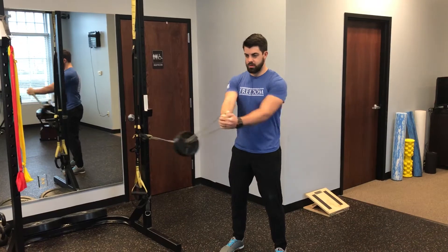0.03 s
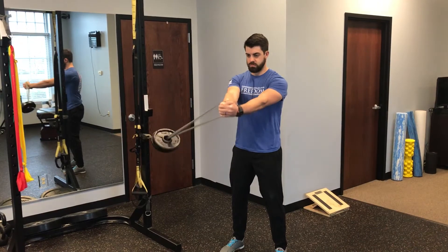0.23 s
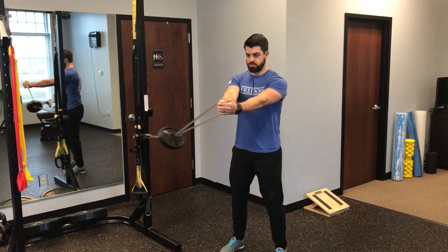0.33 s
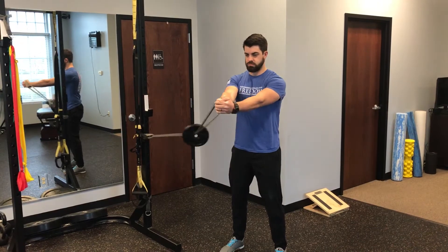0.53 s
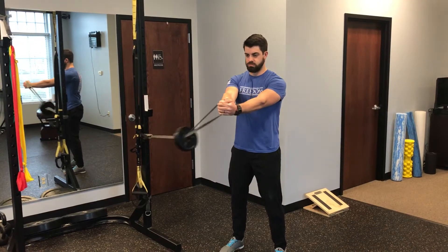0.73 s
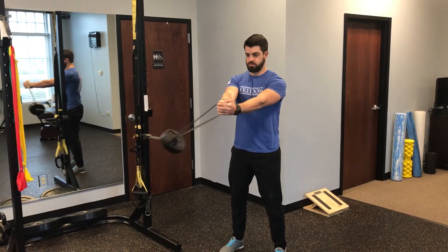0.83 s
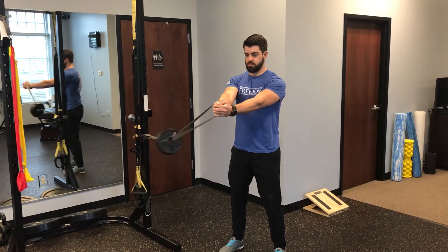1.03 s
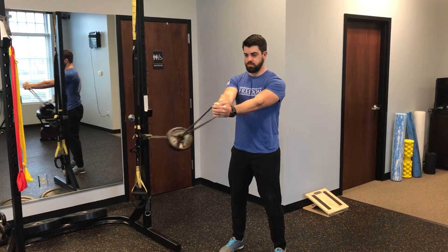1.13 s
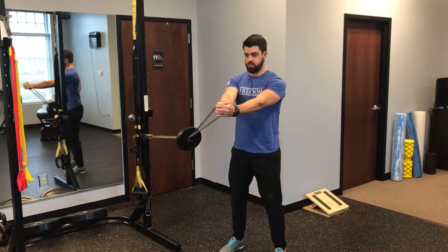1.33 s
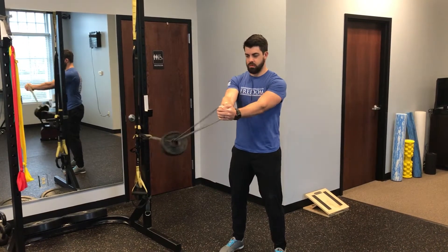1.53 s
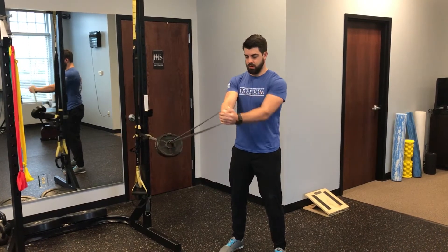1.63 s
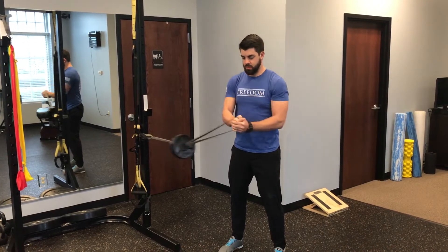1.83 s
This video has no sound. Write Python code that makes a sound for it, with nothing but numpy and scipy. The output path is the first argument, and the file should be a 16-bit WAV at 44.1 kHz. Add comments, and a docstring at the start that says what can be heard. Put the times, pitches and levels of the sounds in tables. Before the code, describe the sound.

Sharp, uneven clanks of a swinging weight plate, with faint squealing scrapes over a low hum.

```python
"""Swinging weight plate

An iron plate swings on a band tied to a steel rack in a small gym. At each turn it knocks and
chatters against its fittings; between knocks it scrapes with a faint squeal. The bare walls
ring on after every clank, over a low ventilation hum and one faint swell of rustle."""
import sys
import numpy as np
from scipy import signal
from scipy.fft import rfft, irfft
from scipy.io import wavfile

SR = 44100
rng = np.random.default_rng(int(sys.argv[2]) if len(sys.argv) > 2 else 0)


def store_pcm(level_fs):
    """Save levels as 16-bit WAV."""
    pcm = np.round(np.clip(level_fs, -1, 1) * 32767).astype(np.int16)
    wavfile.write(sys.argv[1], SR, np.atleast_2d(pcm).T)


N = 83790

# Ventilation hum: pitch_hz, level_db
HUM_TONES = [(58.5, -53), (118, -53), (175, -61.5), (232, -60.5)]
# Colour of the air bed: frequency_hz, relative_db
AIR_COLOUR = [(20, -32), (40, -14.5), (55, 5), (85, -7), (130, 1), (200, -7.5), (290, -9), (420, -21),
              (800, -20), (1200, -21.5), (2400, -29), (4300, -30.5), (7500, -34.5), (12500, -39.5),
              (16000, -40.5)]

# First row: the faint fading ring of a clank at the very start; the rest: scrape strokes.
# start_s, length_s, grind_db, tilt_db_per_octave, squeal_db, upper_squeal_db
TAIL_AND_SCRAPE_CUES = [(0, 0.032, -64.5, 3.5, -65.5, -69), (.29, 0.13, -42, 2, -34, -62),
                        (0.367, 0.18, -46, -1.5, -50, -48.5), (.937, 0.13, -45.5, 7, -44, -57),
                        (1.029, 0.2, -58.5, 3.5, -58, -70)]
# Colour of the grind: frequency_hz, relative_db
GRIND_COLOUR = [(300, -25.5), (800, -6.5), (1150, 3), (1400, -5), (1800, 2), (2300, 3), (3000, -0.5),
                (3600, -4), (4400, -4), (5200, -19), (9000, -32), (16000, -39.5)]
# Low resonances that sing under friction: pitch_hz, width_hz, relative_db
LOW_SQUEAL_MODES = [(1671, 2.3, 5), (1734, 9, -14), (1767, 6.9, -10.5), (1850, 8.9, -8), (1954, 6.8, -12),
                    (2220, 7.5, -14)]
# High resonances that sing under friction: pitch_hz, width_hz, relative_db
UPPER_SQUEAL_MODES = [(3245, 5.4, 1), (2918, 22, -3), (4110, 100, -5), (4560, 25, -4), (7343, 14.4, -10.5),
                      (11700, 33, -19)]

# Hits on the plate: start_s, crack_db, tilt_db_per_octave, plate_db, steel_db, rack_db
HIT_CUES = [ (0.202, -6, 0.5, 2, -29, -54), (.2490, -37, -8, -16, -42, -41),
            (0.2776, -9.5, -4.5, -10, -31, -17.5), (0.3816, -13.5, -4.5, -23, -16, -35),
            (.3970, -24, -6.5, -7, -29, -23.5), (.5206, 5, 0.3, 3, -2.5, -11),
            (.5236, 2, -0.2, -19, -8, -20), (0.5333, 8.5, 3, -10.5, -7, -20),
            (.5360, 4.5, 1, -12, -25, -26), (.5372, 2.5, 4, -24, -24, -38),
            (.5448, -7, -3.5, -32, -13, -36), (.7435, -18.5, 0, -54, -45, -51.5),
            (0.9097, -8, -0.5, -45, -27, -33.5), (0.9126, -5.5, -3.5, -22.5, -36, -22),
            (.9190, -11, 6, -32, -26, -41), (.9241, -8, 5.5, -28, -30, -49),
            (.9507, -16.5, -2, -25, -36, -42), (1.000, -33, -13, -12.5, -43.5, -40),
            (1.053, -47, -4, -12.5, -48.5, -29), (1.087, -40, -5, -14, -46, -46),
            (1.292, -8, 3, -14.5, -27, -6.5), (1.3040, -23, 0, -10.5, -33, -9.5),
            (1.3435, -14.5, -2.5, -29, -32, -23), (1.4120, -21, -2.5, -36, -36, -26),
            (1.4520, -23.5, -2, -21.5, -45, -28), (1.5779, -15, 0, -12, -21, -31),
            (1.5855, -5, 1.5, -28, -51, -35), (1.5909, -14.5, -7, -22, -37, -36),
            (1.5941, -8.5, -1.5, -19.5, -42, -35), (1.6010, -7.5, 4, -33, -35, -26)]
# Colour of the contact click: frequency_hz, relative_db
CLICK_COLOUR = [(100, -51), (400, -12.5), (800, -11), (1400, 1.5), (2200, -2), (3700, 3), (4700, -1),
                (5800, 3), (7600, -2.5), (9200, 1.5), (10300, -7), (11500, -3), (16000, -6)]
# Knock of the iron plate: pitch_hz, relative_db, t60_s
PLATE_MODES = [(1077, -9.5, 0.051), (1111, -5.5, 0.051), (1137, -2, 0.14), (1180, -1.5, 0.054),
               (1524, -6, 0.087), (1600, 0, .04)]
# Ring of the steel fittings: pitch_hz, relative_db, t60_s
STEEL_MODES = [(1254, -3.5, 0.52), (1658, -8.5, 0.66), (2910, -18, .22), (3578, 2.5, 0.29),
               (3650, 9.5, 0.22), (3728, -5, .33), (3720, 6, 0.15), (5420, 7.5, 0.13), (5722, -12, .25),
               (5835, -14, .25), (6239, -3, 0.22), (7064, -6.5, 0.18), (8440, -25.5, .18),
               (8550, -0.5, .15)]
# Clunk of the rack: pitch_hz, relative_db, t60_s
RACK_MODES = [(461, -6, 0.15), (531.6, -11, 0.13), (907, -15.5, .09), (969, 1.5, 0.055), (1375, -12, 0.071),
              (1410, -1.5, 0.041), (1567, 0.5, 0.052), (1865, -9.5, 0.074)]

# Flurries from the loose fittings: start_s, length_s, level_db, tilt_db_per_octave
CHATTER_CUES = [(.203, 0.063, -37, -6), (.273, 0.086, -40.5, -1.6), (0.526, 0.044, -27, 0),
                (.912, 0.045, -41, 6.5), (1.297, 0.073, -42, -2.2), (1.347, 0.16, -49, -2.3),
                (1.58, 0.069, -34, .1)]
# Colour of the chatter: frequency_hz, relative_db
CHATTER_COLOUR = [(100, -31), (400, -17.5), (800, -8), (1400, 3), (2200, -1), (3700, -2.5), (4900, -2),
                  (6500, 4.5), (9200, 0.5), (10300, -5.5), (11500, -6.5), (16000, -11.5)]

# Reverb decay of the gym: frequency_hz, t60_s
ROOM_DECAY = [(150, 0.46), (500, 0.74), (1200, 0.65), (2500, 0.59), (4000, 0.55), (7000, 0.44),
              (10000, 0.37), (15000, 0.19)]
# Early reflections off the walls: delay_s, gain
WALL_ECHOES = [(.0032, 0.15), (.0098, 0.22), (0.0147, .15), (0.0194, 0.14)]
ROOM_DB, SQUEAL_ROOM_DB = -4, -6.5  # reverb tail against the direct sound


def amp(db):
    """Decibels to gain."""
    return 10 ** (np.asarray(db) / 20)


def unit(x):
    """Scales to an rms of one."""
    return x / np.sqrt(np.mean(x ** 2) + 1e-20)


def read(points, hz):
    """Reads a table on a log-frequency axis."""
    f, value = np.transpose(points)
    return np.interp(np.log(hz + 1), np.log(f), value)


def add(mix, s, sound):
    """Mixes a sound in at time s."""
    part = mix[max(round(s * SR), 0):][:len(sound)]
    part += sound[:len(part)]


def bump(centre_s, half_width_s):
    """A bell-shaped envelope that peaks at one."""
    return np.exp(-((np.arange(N) / SR - centre_s) / half_width_s) ** 2)


def drift(width_hz):
    """Slow complex noise that makes a tone waver in level and phase."""
    hz = np.fft.rfftfreq(N, 1 / SR)
    a, b = irfft(rfft(rng.standard_normal((2, N))) / (1 + (hz / width_hz) ** 4), N)
    return (unit(a) + 1j * unit(b)) / np.sqrt(2)


def ventilation():
    """The bed: a wavering hum in soft air noise, whose top end dips briefly."""
    t = np.arange(N) / SR
    air_gain = amp(read(AIR_COLOUR, np.fft.rfftfreq(N, 1 / SR)))
    air = irfft(rfft(rng.standard_normal(N)) * air_gain, N)
    hum = np.zeros(N)
    for hz, db in HUM_TONES:
        waver = 1 + 0.32 * drift(width_hz=18)
        tone = np.exp(2j * np.pi * (hz * t + rng.random()))
        hum += amp(db) * unit((waver * tone).real)
    hiss = signal.sosfiltfilt(signal.butter(4, 5000, "high", fs=SR, output="sos"), air)
    dip_db = -10 * bump(centre_s=1.125, half_width_s=0.06)
    return amp(-49) * unit(air + hiss * (amp(dip_db) - 1)) + hum


def grains(count, per_s, spread_db):
    """A random train of tiny contacts of uneven size."""
    sizes = amp(spread_db * np.minimum(rng.exponential(1, count), 3)) * rng.choice([-1, 1], count)
    return unit(sizes * (rng.random(count) < per_s / SR))


def click(colour, tilt, size=2048, pivot_hz=5000):
    """One contact of unit energy, with the given colour and a tilt in dB per octave."""
    hz = np.fft.rfftfreq(size, 1 / SR)
    db = read(colour, hz) + tilt * np.log2(np.maximum(hz, pivot_hz / 10) / pivot_hz)
    # Minimum phase packs the energy at the front for a hard attack.
    cepstrum = irfft(np.log(amp(db)))
    cepstrum[1:size // 2] *= 2
    cepstrum[size // 2 + 1:] = 0
    wave = irfft(np.exp(rfft(cepstrum)))
    return wave / np.linalg.norm(wave)


def squeal(modes):
    """Resonances kept singing by friction, each wandering in phase."""
    t = np.arange(N) / SR
    walks = np.cumsum(rng.standard_normal((len(modes), N)), 1)
    tones = np.zeros(N)
    for (hz, width_hz, db), walk in zip(modes, walks):
        wander = walk * np.sqrt(2 * np.pi * width_hz / SR)
        tones += amp(db) * np.sin(2 * np.pi * hz * t + wander)
    return unit(tones)


def tail_and_scrapes(peak_share=0.12, squeal_lag_s=0.024):
    """A clank's faint tail opens; then metal slips on metal in strokes that grind and sing."""
    grinding, low_drive, upper_drive = np.zeros((3, N))
    for start_s, length_s, grind_db, tilt, squeal_db, upper_db in TAIL_AND_SCRAPE_CUES:
        count = round(length_s * SR)
        ramp = np.interp(np.arange(count) / count, [0, peak_share, 1], [0, 1, 0])
        envelope = np.sin(np.pi / 2 * ramp)
        slips = grains(N, per_s=1500, spread_db=4)[:count]
        grind = signal.fftconvolve(slips, click(GRIND_COLOUR, tilt))[:count]
        add(grinding, start_s, amp(grind_db) * envelope * unit(grind))
        add(low_drive, start_s, amp(squeal_db) * envelope)
        add(upper_drive, start_s, amp(upper_db) * envelope)
    # The modes store energy, so the squeal builds late and hangs on.
    pole = np.exp(-1 / (squeal_lag_s * SR))
    energy = signal.lfilter([1 - pole], [1, -pole], np.array([low_drive, upper_drive]) ** 2)
    low_gain, upper_gain = np.sqrt(energy)
    grind_in_room = room(grinding, ROOM_DB)
    singing = low_gain * squeal(LOW_SQUEAL_MODES) + upper_gain * squeal(UPPER_SQUEAL_MODES)
    return grind_in_room + room(singing, SQUEAL_ROOM_DB)


def room(x, wet_db, build_s=0.001):
    """Direct sound, a few wall echoes and a diffuse tail whose treble dies first."""
    t = np.arange(SR) / SR
    hz, frame_s, spectrum = signal.stft(rng.standard_normal(SR), SR, nperseg=256)
    decay = amp(-60 * frame_s / read(ROOM_DECAY, hz)[:, None])
    tail = signal.istft(spectrum * decay, SR, nperseg=256)[1][:SR]
    tail *= 1 - np.exp(-t / build_s)
    response = amp(wet_db) * tail / np.linalg.norm(tail)
    response[0] += 1
    for delay_s, gain in WALL_ECHOES:
        add(response, delay_s, np.array([gain]))
    return signal.fftconvolve(x, response)[:N]


def crack(tilt, size=1024, overtones_db=0.5, t60_s=0.014):
    """The transient of a hit: a contact click with the iron's dense, fast-dying overtones."""
    burst = rng.standard_normal(size) * amp(-60 * np.arange(size) / SR / t60_s)
    burst *= amp(overtones_db) / np.linalg.norm(burst)
    burst[0] = 1  # the contact itself
    wave = signal.fftconvolve(burst, click(CLICK_COLOUR, tilt))
    return wave / np.linalg.norm(wave)


def ring(modes, attack_s=0.00039):
    """The body of a hit: modes struck together take a moment to start moving, then decay."""
    t = np.arange(SR // 2) / SR
    wave = sum(amp(db - 60 * t / t60) * np.sin(2 * np.pi * hz * t) for hz, db, t60 in modes)
    wave *= 1 - np.exp(-t / attack_s)
    low_cut_hz = 0.51 * modes[0][0]  # a body hardly radiates far below its lowest mode
    wave = signal.sosfilt(signal.butter(2, low_cut_hz, "high", fs=SR, output="sos"), wave)
    return wave / np.linalg.norm(wave)


def clanks():
    """Each hit is a sharp contact that rings the plate, its fittings and the rack."""
    # Hits take turns among three reverb tails, so close clanks ring without a comb-like tone.
    buses = np.zeros((3, N))
    plate, steel, rack = ring(PLATE_MODES), ring(STEEL_MODES), ring(RACK_MODES)
    for k, (start_s, crack_db, tilt, plate_db, steel_db, rack_db) in enumerate(HIT_CUES):
        bus = buses[k % len(buses)]
        add(bus, start_s, amp(crack_db) * crack(tilt))
        add(bus, start_s, amp(plate_db) * plate + amp(steel_db) * steel + amp(rack_db) * rack)
    return sum(room(bus, ROOM_DB) for bus in buses)


def chatter(attack_s=0.0013, fade_db=-7):
    """Loose fittings rebound in flurries of tiny ticks that die away after the hits."""
    flurries = np.zeros(N)
    for start_s, length_s, db, tilt in CHATTER_CUES:
        t = np.arange(0, length_s, 1 / SR)
        envelope = np.minimum(t / attack_s, 1) * amp(db + fade_db * t / length_s)
        rebounds = unit(grains(N, per_s=900, spread_db=2)[:len(t)])
        add(flurries, start_s, signal.fftconvolve(envelope * rebounds, click(CHATTER_COLOUR, tilt)))
    return room(flurries, ROOM_DB)


def rustle(band_hz=(267, 480), level_db=-57.5):
    """A faint low rustle swells and fades while the plate swings."""
    bandpass = signal.butter(2, band_hz, "band", fs=SR, output="sos")
    noise = signal.sosfilt(bandpass, rng.standard_normal(N))
    return amp(level_db) * bump(centre_s=1.25, half_width_s=0.36) * unit(noise)


def scene():
    """The plate over the ventilation bed, in mono."""
    return (ventilation() + rustle() + clanks() + chatter() + tail_and_scrapes())[None]


def record(dry):
    """A steep low-pass trims the very top of the mix."""
    lowpass = signal.firwin(255, cutoff=15780, window=("kaiser", 8), fs=SR)
    return signal.oaconvolve(dry, lowpass[None], "same")


dry = scene()
out = record(dry)
store_pcm(out)
```